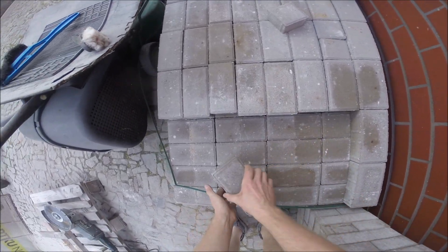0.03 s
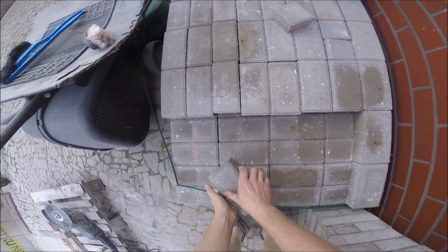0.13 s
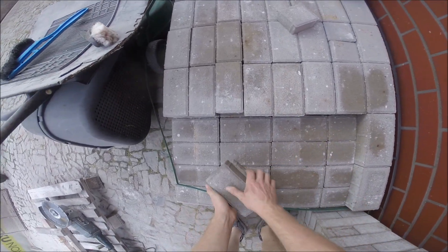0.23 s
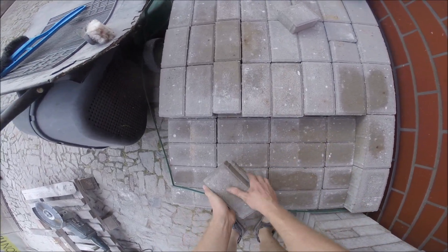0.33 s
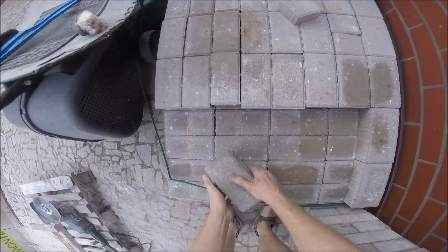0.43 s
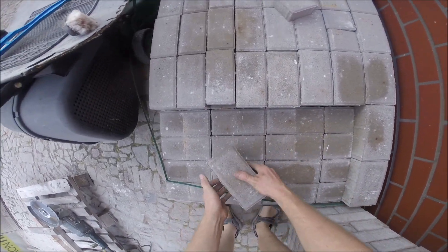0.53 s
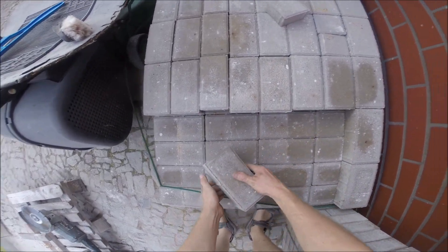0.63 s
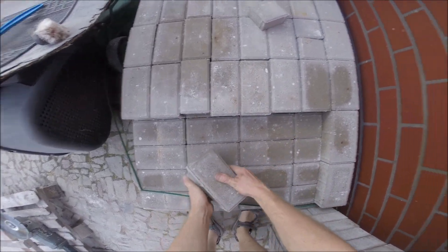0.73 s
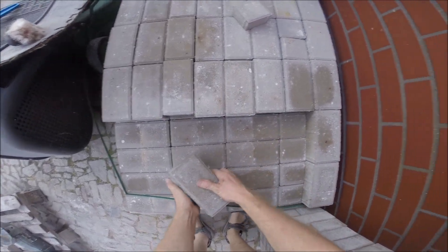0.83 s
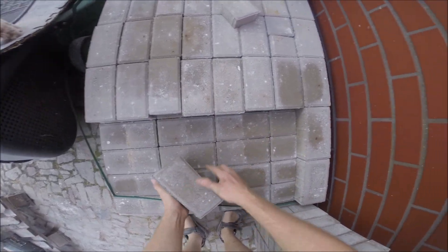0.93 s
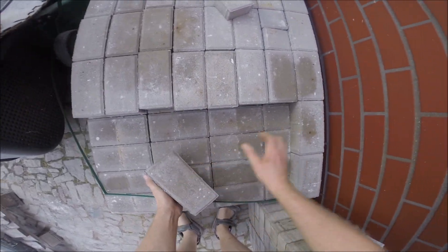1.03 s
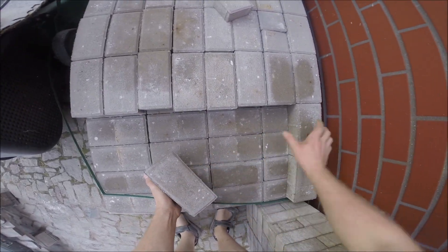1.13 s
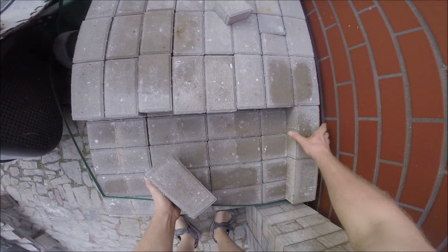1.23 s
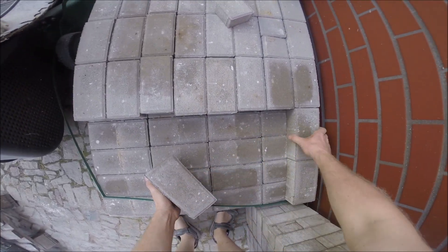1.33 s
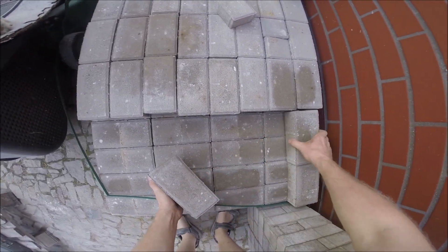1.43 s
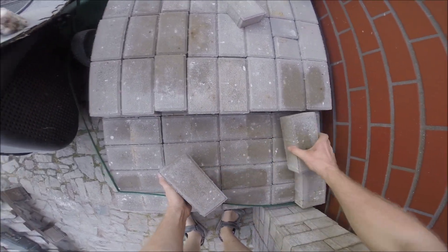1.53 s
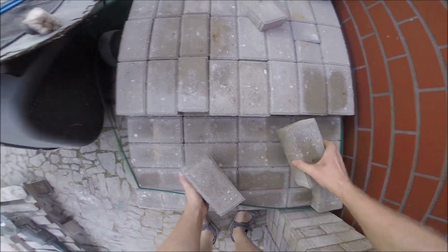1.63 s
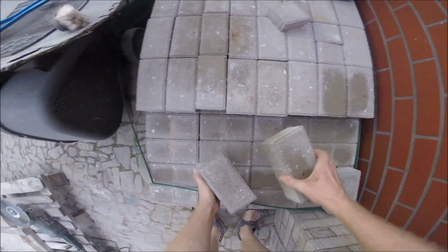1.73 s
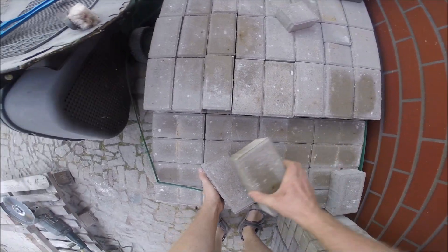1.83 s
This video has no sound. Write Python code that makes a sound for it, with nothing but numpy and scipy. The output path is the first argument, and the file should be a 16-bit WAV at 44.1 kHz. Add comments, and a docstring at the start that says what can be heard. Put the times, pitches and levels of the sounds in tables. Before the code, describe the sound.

Heavy concrete blocks knock sharply, drag grittily, then a second one is knocked loose, close and dry

```python
"""Paving blocks off a pallet

Concrete paving blocks are lifted off a pallet outdoors, an arm's length from the microphone.
The first block tips, clacks twice against its neighbours, corner after corner, and is dragged clear;
light taps follow as the fingers find a grip, then a second is knocked loose and lifted.
Each knock or scrape is a force driving a dead clack, a low thud of the stack, a thin high ring and sand hiss.
The stack and a wall answer briefly, over quiet outdoor air and a faint electronic whine."""
import sys
import numpy as np
from scipy import signal
from scipy.fft import rfft, irfft, next_fast_len
from scipy.io import wavfile

SR = 44100
rng = np.random.default_rng(int(sys.argv[2]) if len(sys.argv) > 2 else 0)


def wav_record(signal):
    """Record a signal, one row per channel, as 16-bit PCM in the file named by sys.argv[1]."""
    frames = np.transpose(np.atleast_2d(signal))
    bounded = np.clip(frames, -1, 1)
    # unit amplitude maps onto the largest positive 16-bit level
    quanta = np.round(bounded * 32767).astype(np.int16)
    wavfile.write(sys.argv[1], SR, quanta)


N = 83790  # length in samples

# Spectrum shape of the outdoor air: pitch_hz, level_db
AIR_SHAPE = [(25, -6), (60, 0), (170, -9), (450, -11.5), (800, -14.5), (1100, -16), (1500, -20.5),
             (4000, -27.5), (8000, -35.5), (11000, -42), (14500, -42), (15500, -43)]
AIR_RMS_DB = -56
# Steady tones of the electronic whine: pitch_hz, rms_level_db
WHINE_TONES = [(8780, -77), (11719, -82), (14626, -79)]

# Decay of the answer from stack and wall: pitch_hz, time_to_fall_60_db_s
YARD_DECAY = [(150, 0.45), (600, 0.26), (2000, .22), (8000, 0.36)]
YARD_DB, YARD_DELAY_S = -17.5, 0.0091

# Light taps as the fingers find a grip: start_s, level_db
TAPS = [(1.0065, -49.5), (1.0862, -41.5), (1.195, -56.5), (1.2460, -63), (1.3365, -54)]
# Resonances of a tap: pitch_hz, width_hz, level_db
TAP_MODES = [(1085, 75.4, 0), (1207, 79, -6.5), (1756, 220, -20)]

# Clack of the first block: pitch_hz, width_hz, level_db
FIRST_CLACK = [(434, 43, -5.5), (658, 170, 2.5), (783, 61, 2), (945, 60, 1), (1065, 130, 1.5),
               (1199, 70, 2.5), (1315, 93, -2.5), (1554, 62, -6.5), (1770, 130, -6.5), (2010, 81, -4.5),
               (2890, 150, -15), (3130, 170, -8), (4730, 410, -32)]
# Duller clack of the second block: pitch_hz, width_hz, level_db
SECOND_CLACK = [(366, 127, -7.5), (534.3, 46, 4), (796, 220, -1), (991, 160, -2), (1150, 47, -1.5),
                (1540, 320, -15.5), (1960, 350, -9.5), (3250, 1100, -26)]
# High ring of the first block: pitch_hz, width_hz, level_db
FIRST_RING = [(5890, 27, -4.5), (6275, 45, 2.5), (6370, 160, -12), (7500, 33, -23), (12510, 360, -18.5)]
# High ring of the second block: pitch_hz, width_hz, level_db
SECOND_RING = [(5680, 47, 2.5), (6156, 69, 2.5), (7550, 22, 4), (11900, 170, -4.5)]
SECOND_FROM_S = 0.95  # the hand moves on to the second block
# Thud of the stack underneath: pitch_hz, width_hz, level_db
STACK_THUD = [(156.1, 27, 0.5), (247, 20, -3.5), (296.5, 120, -6), (432, 68, -7)]
# Hiss of loose sand between the faces: pitch_hz, level_db
SAND_HISS = [(1500, -17), (3200, 11.5), (5000, 5.5), (7000, -4), (10000, -12), (13000, -19.5),
             (16000, -44.5)]
THUD_LOW_HZ, RING_TOP_HZ = 108.1, 8500
THUD_SHARE = 0.28  # the thud's upper edge over the contact's brightness

# Scrapes; thud, ring and sand are against the clack:
# start_s, rise_s, fall_s, level_db, brightness_hz, thud_db, ring_db, sand_db
SCRAPES = [ (.195, 0.034, 0.0078, -46, 1520, 10.5, -17.5, -29.5),
           (.250, 0.022, 0.2, -39.5, 2010, 0, -15, -37), (0.401, 0.042, 0.084, -43.5, 1570, -2.5, -20, -25),
           (0.479, 0.018, 0.16, -36.5, 1760, -8, -23.5, -28),
           (0.584, 0.01, 0.26, -44.5, 1540, -5, -21, -19.5),
           (.725, 0.068, 0.073, -30, 1870, -3, -17.5, -29.5),
           (0.779, 0.032, 0.076, -27.5, 820, -4.5, -27.5, -29),
           (.855, 0.017, 0.045, -45, 680, 4, -43.5, -28), (0.922, 0.054, 0.11, -65.5, 1200, -4, -5.5, -1.5),
           (1.071, 0.025, 0.016, -42.5, 1500, -3.5, -18.5, -23),
           (1.399, 0.0038, 0.16, -45, 1140, -11.5, -20.5, -24.5),
           (1.445, 0.043, 0.2, -34.5, 1190, -19.5, -20, -28.5),
           (1.545, 0.024, 0.15, -35.5, 1300, -6.5, -18.5, -20.5),
           (1.590, 0.016, 0.067, -39, 1850, -2.5, -21, -18)]
SCRAPE_LOW_HZ = 391.6
GRAINS_PER_S, GRAIN_SPREAD_DB = 2200, 1.5
RISE_DB, FALL_DB = 17, 36.5  # change of the stroke over rise_s and over fall_s

# Knocks; thud, ring and sand are against the clack, crumbling_s is the time to fall 20 dB:
# start_s, level_db, low_edge_hz, brightness_hz, thud_db, ring_db, sand_db, crumbling_s
KNOCKS = [ (.1780, -32, 300, 1394, -0.5, -22, -41, 0.017),
          (.2199, -10.5, 1466, 2108, -14, -33.5, -48.5, 0.0022),
          (0.2227, -18.5, 2200, 2100, -15.5, -33, -54.5, 0.0041),
          (.2266, -13, 704, 950, -20, -36, -65, 0.0029),
          (0.2406, -19, 1110, 3130, -3.5, -21.5, -49.5, 0.011),
          (.2440, -18.5, 960, 2000, -1, -28, -52, 0.0024), (.2482, -12.5, 710, 1000, -27, -36, -58, 0.0027),
          (.3060, -31.5, 604, 2200, -3.5, -18, -40, 0.024), (0.435, -39, 500, 1180, -3, -19, -34, 0.017),
          (.4860, -38.5, 850, 1770, -7.5, -26, -53, 0.0097),
          (0.5086, -33, 810, 1930, -6, -28.5, -39, 0.0041),
          (0.519, -37.5, 800, 2490, -3, -20.5, -39, 0.0059),
          (.5420, -44, 1020, 2200, -25, -14.5, -38, 0.0088), (.5862, -41, 990, 1980, -17, -23, -44, 0.011),
          (0.5954, -35, 1020, 1450, -34.5, -32, -44, 0.025), (0.61, -36.5, 500, 1300, -7, -24.5, -32, .012),
          (0.619, -38, 500, 1270, -3, -34, -26, 0.012), (.7310, -47.5, 800, 2200, -28, -12, -26, 0.0046),
          (0.781, -58, 800, 2300, -15, -8, -21, 0.0044), (.8015, -32.5, 591, 1710, -2, -34, -31, 0.0072),
          (.8090, -27.5, 642, 1170, -17, -22.5, -52, 0.015),
          (0.8201, -38, 499, 1100, 8, -26, -34.5, 0.0092), (1.095, -46, 606, 1400, -11.5, -15, -40, .01),
          (1.4373, -30, 704, 1020, -8.5, -33.5, -44, 0.022), (1.483, -32, 710, 1220, -1.5, -27, -43, 0.018),
          (1.506, -25.5, 744, 1240, -17, -29.5, -59, .007),
          (1.5204, -21.5, 650, 1160, -11, -45, -56, 0.0025),
          (1.5256, -27.5, 706, 1060, -30, -25.5, -43, 0.0163),
          (1.641, -43, 720, 1490, -18, -16, -20, 0.025), (1.6769, -31, 798, 1300, -12.5, -24, -27.5, 0.033)]
KNOCK_S = 0.01  # knock and tap levels are rms over this time
CRUMBLE_DB = -16.5  # grit crushed in a knock, against the blow itself
CLICK_S, CLICK_DB = 0.2203, -26  # a tiny bright click as the hardest strike overloads the microphone

FULL_SCALE, TOP_HZ = 1.0, 15700


def amp(db):
    """Decibels to gain."""
    return 10 ** (np.asarray(db) / 20)


def along(points, hz):
    """Read a curve of (Hz, value) points along a log frequency axis."""
    point_hz, values = np.transpose(points)
    return np.interp(np.log(hz + 1), np.log(point_hz + 1), values)


def filtered(x, response):
    """Multiply the spectrum of x by a response of frequency."""
    size = next_fast_len(len(x) + 4096)
    spectrum = rfft(x, size) * response(np.fft.rfftfreq(size, 1 / SR))
    return irfft(spectrum, size)[:len(x)]


def normed(x):
    """Scale x to energy 1."""
    return x / np.sqrt(np.sum(x ** 2) + 1e-20)


def add(track, start_s, sound):
    """Mix a sound into the track at its start time."""
    part = track[round(start_s * SR):][:len(sound)]
    part += sound[:len(part)]


def resonances(modes, f):
    """Gain of a body whose resonances add in power."""
    power = 0
    for center_hz, width_hz, db in modes:
        detuning = (f * f - center_hz ** 2) / (f * width_hz + 1e-6)
        power = power + amp(2 * db) / (1 + detuning ** 2)
    return np.sqrt(power)


def softened(f, edge_hz):
    """Steep low-pass: a blunter contact gives less treble."""
    return 1 / np.sqrt(1 + (f / edge_hz) ** 8)


def contact(f, low_hz, bright_hz):
    """The band that a contact excites: a sharp corner gives more treble and less bass."""
    bass_cut = f * f / np.hypot(f * f, low_hz ** 2)
    return softened(f, bright_hz) * bass_cut


def struck(force, gain):
    """Pass a force through a causal, sharp-fronted response with this gain; energy 1."""
    size = 8192
    log_gain = np.log(gain(np.fft.rfftfreq(size, 1 / SR)) + 1e-5)
    # Folding the cepstrum onto positive times gives minimum phase
    cepstrum = irfft(log_gain)
    cepstrum[1:size // 2] *= 2
    cepstrum[size // 2 + 1:] = 0
    response = irfft(np.exp(rfft(cepstrum)))[:size // 2]
    return normed(signal.fftconvolve(force, response)[:len(force)])


def background():
    """Quiet outdoor air as shaped noise, and a faint electronic whine of steady sines."""
    noise = rng.standard_normal(N)
    air = normed(filtered(noise, lambda f: amp(along(AIR_SHAPE, f)))) * np.sqrt(N)  # rms 1
    t = np.arange(N) / SR
    whine = sum(np.sqrt(2) * amp(db) * np.sin(2 * np.pi * hz * t) for hz, db in WHINE_TONES)
    return amp(AIR_RMS_DB) * air + whine


def yard(x):
    """Add a short scattered answer from the stack and the wall: noise decaying at each pitch."""
    hz, t, bins = signal.stft(rng.standard_normal(SR // 3), SR, nperseg=256)
    decay = amp(-60 * t / along(YARD_DECAY, hz)[:, None])
    tail = signal.istft(bins * decay, SR, nperseg=256)[1]
    tail = np.pad(normed(tail), (round(YARD_DELAY_S * SR), 0))
    return x + amp(YARD_DB) * signal.fftconvolve(x, tail)[:len(x)]


def taps():
    """Small hollow ticks, each one a single impulse through a few resonances."""
    track = np.zeros(N)
    impulse = signal.unit_impulse(SR // 3)
    tick = struck(impulse, lambda f: resonances(TAP_MODES, f) * softened(f, edge_hz=1730))
    for start_s, db in TAPS:
        add(track, start_s, amp(db) * np.sqrt(KNOCK_S * SR) * yard(tick))
    return track


def overload_click():
    """A single full-band click, one sample long, as the hardest strike overloads the microphone."""
    track = np.zeros(N)
    add(track, CLICK_S, amp([CLICK_DB]))
    return track


def block(force, start_s, low_hz, bright_hz, thud_db, ring_db, sand_db):
    """What a contact force sets off: clack, thud, ring and the hiss of sand."""
    if start_s < SECOND_FROM_S:
        clack_modes, ring_modes = FIRST_CLACK, FIRST_RING
    else:
        clack_modes, ring_modes = SECOND_CLACK, SECOND_RING
    thud_top_hz = THUD_SHARE * bright_hz
    clack = struck(force, lambda f: resonances(clack_modes, f) * contact(f, low_hz, bright_hz))
    thud = struck(force, lambda f: resonances(STACK_THUD, f) * contact(f, THUD_LOW_HZ, thud_top_hz))
    ring = struck(force, lambda f: resonances(ring_modes, f) * softened(f, RING_TOP_HZ))
    # Signed square: the largest grains hiss most
    sand = struck(force * np.abs(force), lambda f: amp(along(SAND_HISS, f)))
    return yard(clack + amp(thud_db) * thud + amp(ring_db) * ring + amp(sand_db) * sand)


def scrapes():
    """Rough faces catch on grain after grain while the stroke swells and fades."""
    track = np.zeros(N)
    t = np.arange(SR // 2) / SR
    for start_s, rise_s, fall_s, db, bright_hz, thud_db, ring_db, sand_db in SCRAPES:
        swell_db = RISE_DB * (t - rise_s) / rise_s
        fade_db = FALL_DB * (rise_s - t) / fall_s
        stroke = amp(np.minimum(swell_db, fade_db))
        caught = rng.random(len(t)) < GRAINS_PER_S / SR
        direction = rng.choice([-1, 1], len(t))
        grains = caught * direction * amp(GRAIN_SPREAD_DB * rng.standard_normal(len(t)))
        sound = block(grains * stroke, start_s, SCRAPE_LOW_HZ, bright_hz, thud_db, ring_db, sand_db)
        add(track, start_s, amp(db) * np.linalg.norm(stroke) * sound)
    return track


def knocks():
    """Each knock is one blow followed by a few milliseconds of crumbling grit."""
    track = np.zeros(N)
    t = np.arange(SR // 3) / SR
    for start_s, db, low_hz, bright_hz, thud_db, ring_db, sand_db, crumble_s in KNOCKS:
        force = amp(CRUMBLE_DB) * rng.standard_normal(len(t)) * amp(-20 * t / crumble_s)
        force[0] = 1  # the blow
        sound = block(force, start_s, low_hz, bright_hz, thud_db, ring_db, sand_db)
        add(track, start_s, amp(db) * np.sqrt(KNOCK_S * SR) * sound)
    return track


def scene():
    """Taps, scrapes and knocks over the still background, with the overload click."""
    return (background() + taps() + overload_click() + scrapes() + knocks())[None]


def record(dry):
    """The microphone track: peaks stop at full scale, then everything above the band limit is cut."""
    clipped = np.clip(dry[0], -FULL_SCALE, FULL_SCALE)
    return filtered(clipped, lambda f: f < TOP_HZ)[None]


dry = scene()
out = record(dry)
wav_record(out)
```